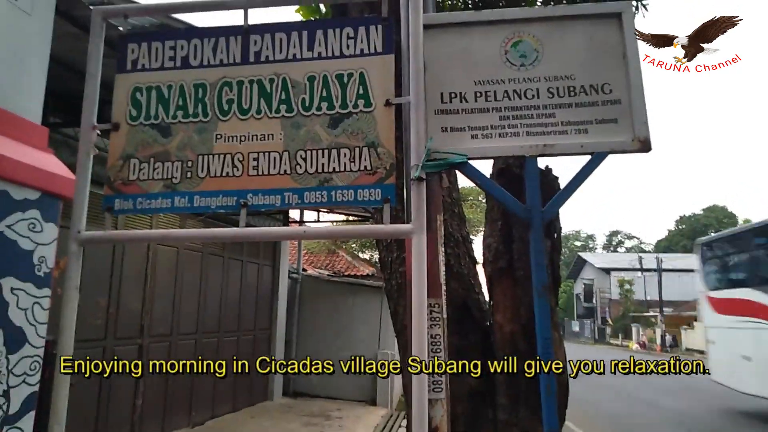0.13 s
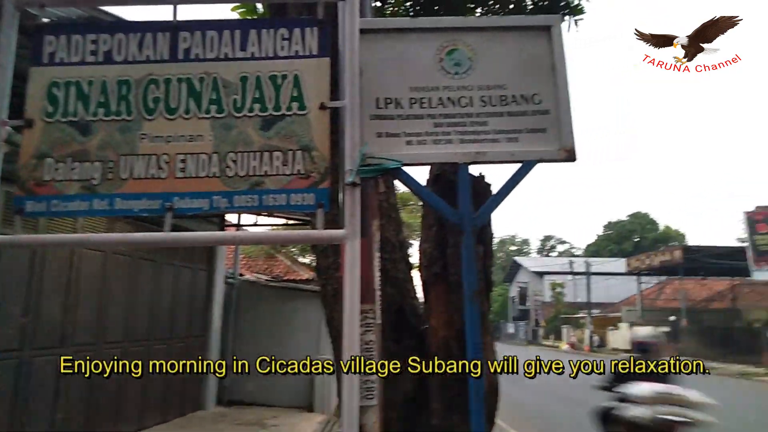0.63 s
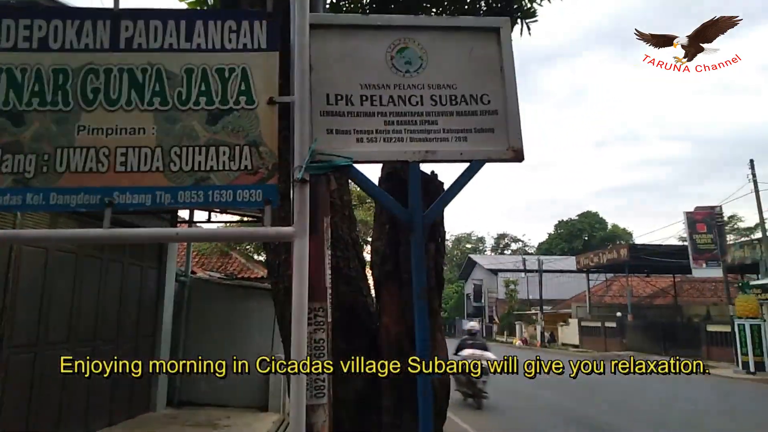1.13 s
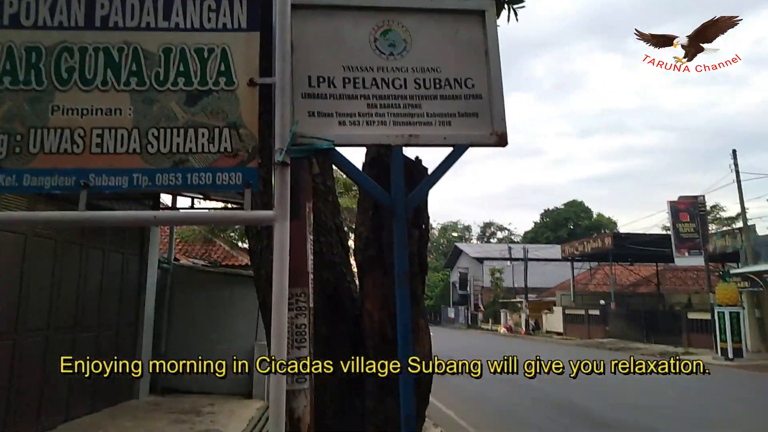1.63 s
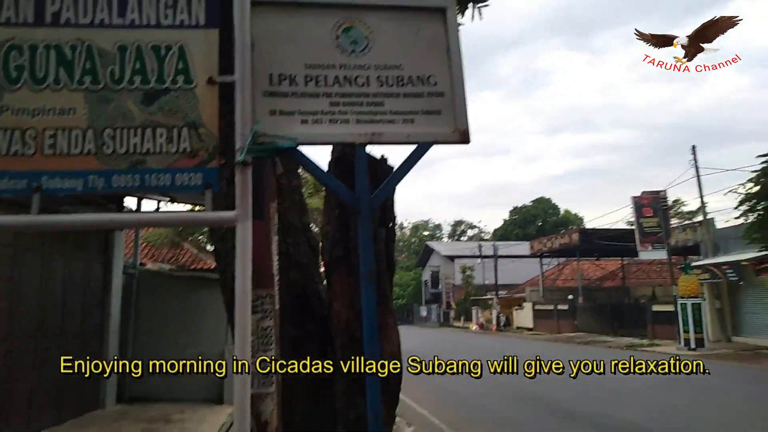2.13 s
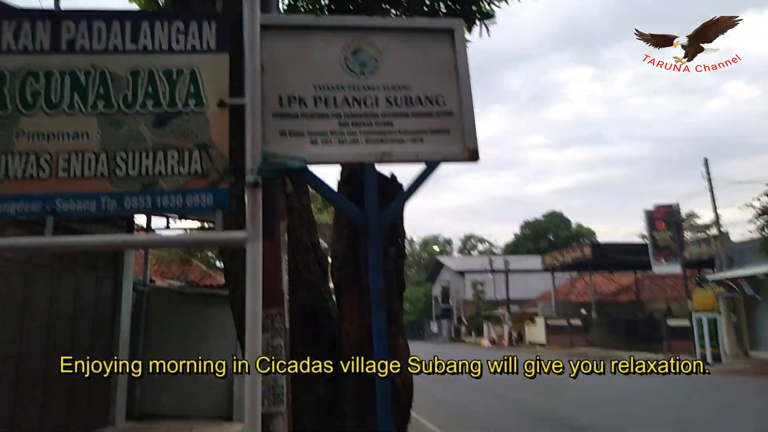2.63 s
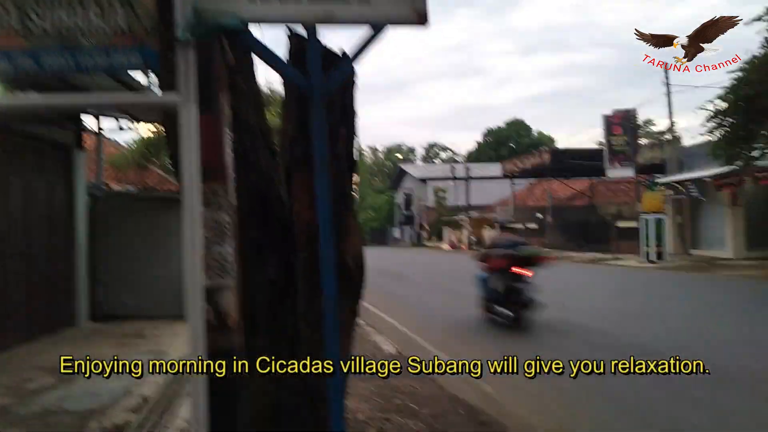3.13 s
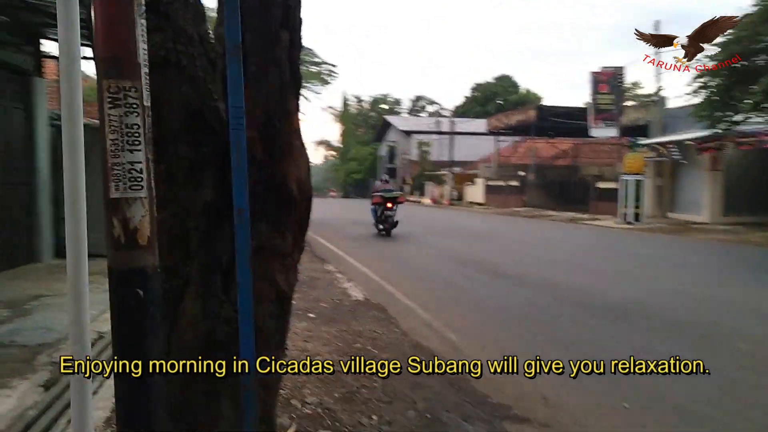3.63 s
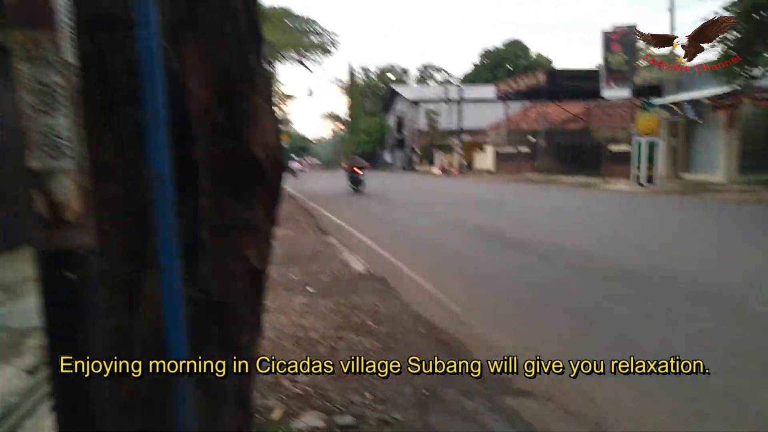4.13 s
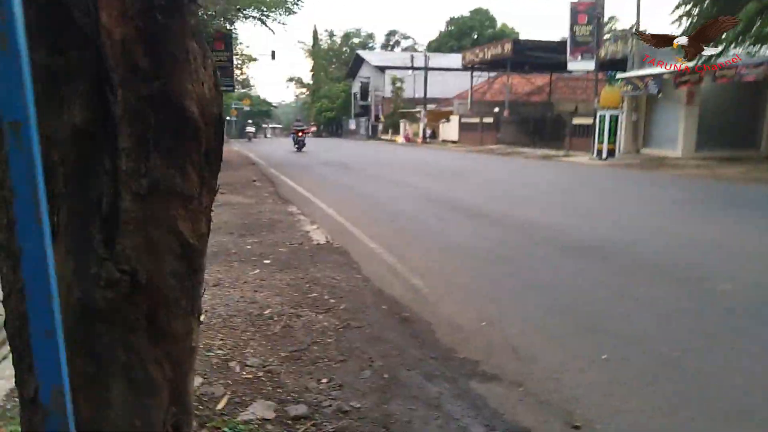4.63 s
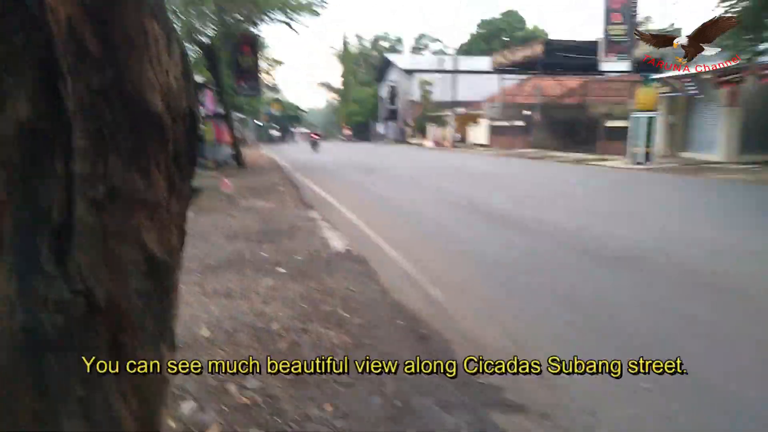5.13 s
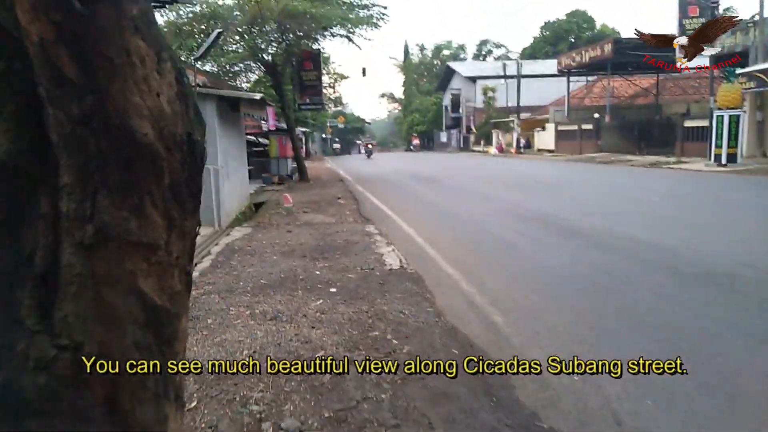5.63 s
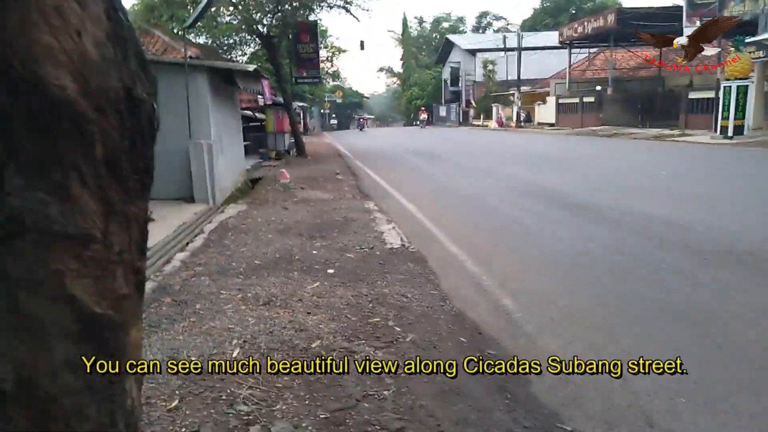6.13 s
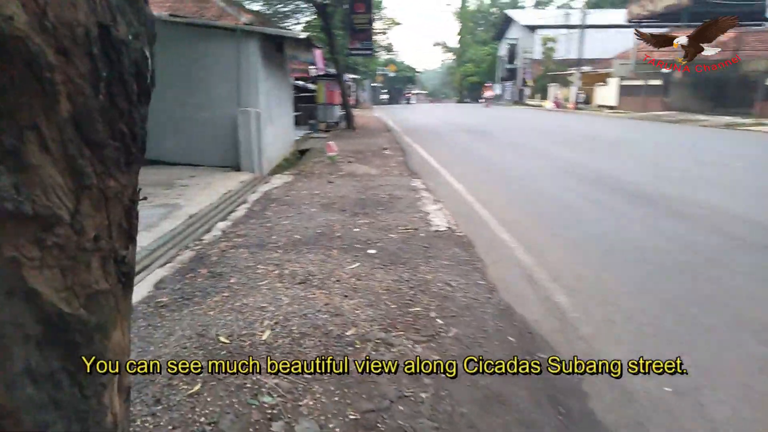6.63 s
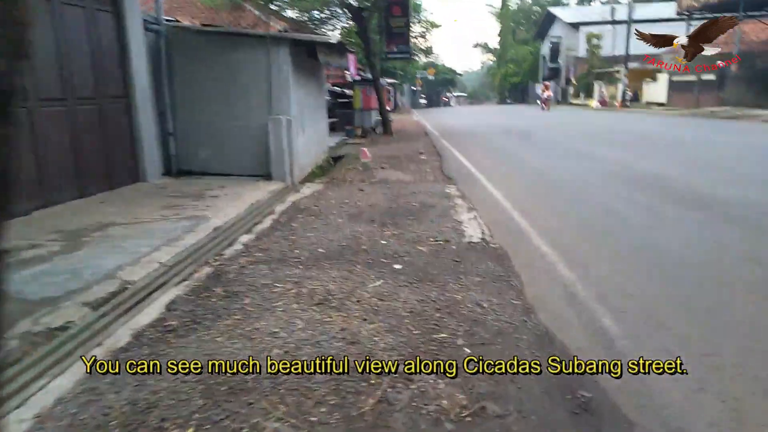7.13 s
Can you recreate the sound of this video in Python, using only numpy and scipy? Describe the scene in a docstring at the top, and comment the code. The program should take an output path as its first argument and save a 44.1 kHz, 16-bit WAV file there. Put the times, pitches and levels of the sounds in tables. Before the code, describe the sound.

A bus pulls away over loud tyre roar, a rooster crows faintly, then a motorbike whips past close and fades before a small bird trills.

```python
"""A motorbike comes close, passes the microphone at five metres and fades down a village road: its thump is a
stack of firing harmonics, Doppler-shifted with its gear whine. A bus pulls away and another motorbike leaves,
both summed from harmonics; road roar, rumble and hiss are shaped noise, while narrow hums from tyre tread and
the passing bike's body and a far engine are wavering tones. Behind them a rooster crows faintly on two
harmonics and a small bird trills in short falling whistles. Tiny noise ticks sit close by; a phone's single
microphone hears it all from the roadside."""
import sys
import numpy as np
from scipy import signal
from scipy.fft import rfft, irfft, next_fast_len
from scipy.io import wavfile
from scipy.ndimage import uniform_filter1d, map_coordinates

SR = 44100
rng = np.random.default_rng(int(sys.argv[2]) if len(sys.argv) > 2 else 0)


def store_wav(level_fs):
    """Save 16-bit WAV to argv[1]."""
    pcm = np.round(np.clip(np.atleast_2d(level_fs), -1, 1) * 32767)
    wavfile.write(sys.argv[1], SR, pcm.T.astype(np.int16))


def gain_from_db(level_db):
    """Convert decibel levels to linear amplitude factors (20 dB per decade)."""
    decades = np.asarray(level_db, float) / 20
    return 10 ** decades


N = 320166
T = np.arange(N) / SR

# rooster, faint: start_s, pitch_hz, level_db
ROOSTER_CROW = [(.84, 688, -60.5), (.9, 706, -24), (1, 728, -30), (1.12, 723, -32), (1.2, 704, -30),
                (1.26, 688, -57.5)]
# bird phrases: start_s, notes (count), gap_s, gap_growth_s (per note), first_db, last_db, grace_db (re the note)
BIRD_PHRASES = [(5.506, 12, .045, 0, -43, -29.5, -4), (6.067, 18, .0672, .00022, -34.5, -33.5, -14)]
NOTE_SCATTER_DB = 1.2
# faint ticks close by: start_s, level_db (nominal, 3 dB is taken off)
CLOSE_TICKS = [(5.9464, -28), (6.8284, -29), (6.8494, -36)]

# far engine, speeding up gently
DRONE_FROM_S, DRONE_HZ, DRONE_RISES_HZ_PER_S = 4.5, 52, 1.35
DRONE_DB, DRONE_OCTAVE_DB = -33.5, -45.5

# leaving motorbike: start_s, pitch_hz (base of its harmonics), level_db (added to each harmonic)
LEAVING_ENGINE = [(0, 33.64, -25), (.5, 31.62, -21), (1.05, 31.14, -25), (1.75, 30.15, -35.5)]
# its harmonics: multiple (of pitch_hz), level_db (relative)
LEAVING_HARMONICS = [(3, -0.5), (4, 0.5), (5, -41), (6, -6.5), (7, -30), (8, -15)]

# bus diesel: start_s, pitch_hz (base of its orders), level_db (of the firing tone)
BUS_ENGINE = [(0, 63.0, -22), (.2, 63.8, -18), (.6, 63.6, -17.5), (.76, 64.4, -26), (.95, 65.0, -23),
              (1.2, 64.7, -13.5), (1.9, 64.6, -17), (2.5, 65.5, -21.5), (3.5, 67.3, -31.5),
              (3.9, 68.5, -28), (4.45, 69.3, -40), (4.75, 69.8, -37), (5.2, 70.8, -36), (5.6, 71.5, -31),
              (5.85, 73.6, -49)]
# further bus orders: multiple (of pitch_hz), level_db (re the firing tone)
BUS_EXTRA_ORDERS = [(.5, -30), (1.5, -33.5), (3, -13.5)]
# bus octave, swelling and sinking on its own: start_s, level_db
BUS_OCTAVE_LEVEL = [(0, -31), (.4, -33), (1.1, -36), (2.8, -30), (3.5, -49), (3.9, -25), (4.9, -35.5),
                    (5.85, -40)]
# bus turbo whistle: start_s, pitch_hz, level_db
TURBO_WHISTLE = [(.3, 7600, -70), (.45, 7750, -48), (.95, 8400, -49), (1.1, 8500, -70)]

# noise spectra: frequency_hz, density_db (per Hz, relative: the noise is scaled to rms 1)
ROAR_SPECTRUM = [(130, -35), (220, -5), (290, -7.5), (340, -1.5), (420, -4.5), (600, 1), (860, 1),
                 (1030, -2), (1330, 0), (1600, -2.5), (1960, -2.5), (2500, -9.5), (3100, -17.5),
                 (3900, -55.5), (5000, -51)]
RUMBLE_SPECTRUM = [(20, -34), (33, -1), (45, -3), (78, -3), (110, 2), (170, 0), (240, -7.5), (350, -16.5),
                   (460, -67)]
FAR_HISS_SPECTRUM = [(1880, -30), (3200, 0), (3490, 1), (3800, -4), (4120, -6), (4490, -4), (5450, -11),
                     (6270, -7.5), (7500, -2.5), (10500, -18.5), (15700, -61)]
# near hiss, with the microphone's two treble peaks: the same columns
NEAR_HISS_SPECTRUM = [(1880, -36), (3200, 4), (4180, -10), (6270, -8.5), (7600, 3.5), (8740, -6.5),
                      (9990, -9.5), (12000, -9.5), (13600, -9.5), (15200, -3.5), (15700, -5)]
# tyre roar on the asphalt: start_s, level_db
ROAR_LEVEL = [(0.0, -13), (0.44, -13.5), (1.19, -14), (1.37, -15.5), (1.82, -14.5), (2.22, -16.5),
              (2.51, -13), (2.81, -14), (3.11, -20), (3.7, -21), (3.88, -24), (5.6, -27), (6.33, -30.5),
              (7.12, -30), (7.26, -31.5)]
# narrow notes, from tyre tread and (near 1.36 kHz) the passing bike's body: centre_s, half_length_s, pitch_hz,
# level_db
NARROW_NOTES = [(.12, .05, 745, -26), (1.05, .2, 870, -23), (1.75, .15, 850, -27), (2.52, .08, 1360, -25),
                (2.82, .06, 1365, -24)]
# echo off the asphalt while the bike is close: start_s, lag_ms, strength (ratio, negative is inverted)
GROUND_ECHO = [(2.3, .23, 0), (2.65, .228, -.25), (2.87, .2, -.1), (3.05, .285, -.4), (3.4, .315, -.35),
               (3.9, .34, -.2), (4.3, .35, 0)]
# near treble as traffic goes by: peak_s, rise_s, fall_s, hiss_db, clatter_db (valves)
TREBLE_SWELLS = [(.3, .4, 0.63, -28.5, -41), (.28, .08, 0.085, -45, -27), (2.63, 0.082, 0.13, -24.5, -31),
                 (2.8, 0.082, 0.051, -33, -24), (3.2, 0.13, 0.22, -40.5, -37),
                 (7.079, 0.11, 0.15, -44, -72)]
# roar tilt in dB per octave: duller with time, brighter as the bike goes by
TILT_DB, TILT_DULLS_DB_PER_S, TILT_NEAR_DB, TILT_NEAR_S = 1, 0.41, 4, 0.21
TILT_FROM = .55  # the tilt is held below this share of its pivot frequency
# the low rumble follows the roar sluggishly (dB per dB, smoothed); its tilt is per octave
RUMBLE_DB, RUMBLE_FOLLOWS, RUMBLE_SMOOTHING_S, RUMBLE_DULLS_DB_PER_S = -10.5, 0.7, 0.72, 0.3
NEAR_FLOOR_DB, FAR_FLOOR_DB = -62.5, -44.5
FAR_BUS_DB, FAR_BUS_FADES_DB_PER_S = -39, 7.6
FAR_BIKE_DB, HISS_LOSS_DB = -28, 4.5  # at the closest point; loss for each doubling of distance

# passing motorbike
PASS_S, PASS_M, SPEED_M_PER_S, SOUND_M_PER_S, HEARD_FROM_S = 2.72, 5, 20.2, 343, 1.5
TURN_S, TURN_LENGTH_S = 2.82, 0.05  # when the pipe swings towards the listener
# its firing rate sags: start_s, pitch_hz (before the Doppler shift)
PASSING_ENGINE = [(2.75, 45.85), (3.1, 45.1), (5.4, 41.0), (7.26, 38.5)]
# its exhaust points backwards: multiple (of the firing rate), front_db, behind_db (relative)
PASSING_HARMONICS = [(1, -42, -38), (2, -25, -27), (3, -31.5, -18), (4, -24.5, -16), (5, -33.5, -24),
                     (6, -42, -30.5), (7, -48, -37), (8, -47, -44), (9, -59, -51), (10, -45, -41.5)]
# its thump: start_s, level_db (added to each harmonic)
THUMP_LEVEL = [(1.5, -7), (1.8, -4), (2.5, -2), (3, -2), (3.3, -7), (3.9, -9.5), (5, -9.5), (5.8, -13.5),
               (6.2, -18), (6.7, -17), (7.26, -17)]
MESH = 62.8  # gear teeth per firing
# its gear whine: start_s, level_db, sideband_db
GEAR_WHINE = [(1.5, -43, -60), (2.3, -41, -57), (2.75, -26.5, -42), (3.1, -34, -46), (3.35, -46, -55),
              (4.2, -49, -55), (4.6, -43, -51), (5.1, -45, -45), (5.6, -45, -48), (5.85, -54, -57),
              (6.3, -50, -52), (6.6, -57, -59), (7.26, -53, -54)]


def unit(x):
    """Scale to rms 1."""
    return x / np.sqrt(np.mean(x ** 2) + 1e-20)


def curves(rows, t=T):
    """One value per instant for each column after the time."""
    s, *cols = np.transpose(rows)
    return [np.interp(t, s, c) for c in cols]


def sounding(rows, fade):
    """Gain that fades in before the first row and out after the last."""
    fade_in = np.clip((T - rows[0][0]) / fade + 1, 0, 1)
    fade_out = np.clip((rows[-1][0] - T) / fade + 1, 0, 1)
    return fade_in * fade_out


def wobble(rate):
    """A smooth random curve, rate knots a second."""
    return map_coordinates(rng.standard_normal(int(N * rate / SR) + 4), [T * rate])


def tones(hz, orders, waver_db, blur, rate):
    """Harmonics (multiple, dB rms) of one pulse train; echoes make each waver in size and phase (blur, radians)."""
    turn = 2 * np.pi * np.cumsum(hz) / SR
    total = np.zeros(N)
    for multiple, db in orders:
        size = np.sqrt(2) * gain_from_db(db + waver_db * wobble(rate))
        total -= size * np.cos(multiple * turn + blur * wobble(rate))
    return total


def rush(spectrum, tilt_db, pivot_hz, patchy_db, ground=False, size=1024):
    """Noise of rms 1 with drifting patches, a moving tilt and a comb from the ground echo."""
    hz, t, z = signal.stft(rng.standard_normal(N), SR, nperseg=size)
    f, db = np.transpose(spectrum)
    colour = np.interp(np.log(hz + 1), np.log(f), db, left=-120, right=-120)[:, None]
    octaves = np.log2(np.maximum(hz[:, None] / pivot_hz, TILT_FROM))
    slope = octaves * np.interp(t, T, tilt_db + 0 * T)
    across_hz = uniform_filter1d(rng.standard_normal(z.shape), size=7, axis=0)
    patches = unit(uniform_filter1d(across_hz, size=9, axis=1))
    lag_ms, echo = curves(GROUND_ECHO, t)
    comb = np.abs(1 + ground * echo * np.exp(-2j * np.pi * hz[:, None] * lag_ms / 1e3))
    gain = gain_from_db(colour + slope) * comb
    gain = gain / np.sqrt(np.mean(gain ** 2, axis=0))  # a new colour leaves the level alone
    return unit(signal.istft(z * gain * gain_from_db(patchy_db * patches), SR, nperseg=size)[1][:N])


def rooster():
    """A hoarse crow, strongest on its second harmonic."""
    hz, db = curves(ROOSTER_CROW)
    return gain_from_db(db) * tones(hz, [(1, 0), (2, 1)], waver_db=2.5, blur=0.22, rate=55)


def bird():
    """Short falling whistles after higher grace notes: a fast swelling phrase, a slow even one; one echo."""
    song, t = np.zeros(N + SR), np.arange(-SR // 25, SR // 25) / SR
    note = np.exp(-.5 * ((t - .007) / 0.0044) ** 2) * np.sin(2 * np.pi * 3440 * t * (1 - 1.23 * t))
    grace = np.exp(-.5 * ((t + 0.0095) / 0.007) ** 2) * np.sin(2 * np.pi * 3560 * t * (1 - 0.53 * t))
    for start, count, gap, grows, first_db, last_db, grace_db in BIRD_PHRASES:
        whistle = note + grace * gain_from_db(grace_db)
        for k in range(count):
            db = first_db + (last_db - first_db) * np.sin(1.5 * k / (count - 1))
            db += NOTE_SCATTER_DB * rng.standard_normal()
            centre = round((start + gap * k + grows * k * k / 2) * SR)
            song[centre - SR // 25:][:len(t)] += gain_from_db(db) * whistle
    echo = gain_from_db(-9) * np.roll(song, round(0.015 * SR))
    return (song + echo)[:N]


def far_drone():
    """A distant engine heard as a slowly rising tone and its octave, both wavering."""
    hz = DRONE_HZ + DRONE_RISES_HZ_PER_S * (T - DRONE_FROM_S)
    drone = tones(hz, [(1, DRONE_DB), (2, DRONE_OCTAVE_DB)], waver_db=2.0, blur=0.9, rate=12)
    return np.clip(T - DRONE_FROM_S + .5, 0, 1) * drone


def leaving_bike():
    """Upper harmonics of a sinking engine pitch that fade out as the motorbike leaves."""
    hz, level_db = curves(LEAVING_ENGINE)
    engine = tones(hz, LEAVING_HARMONICS, waver_db=1.5, blur=.35, rate=6)
    return sounding(LEAVING_ENGINE, fade=.3) * gain_from_db(level_db) * engine


def bus_engine():
    """A heavy firing tone with its octave; unequal cylinders add half orders, and a third order joins them."""
    hz, tone_db = curves(BUS_ENGINE)
    orders = [(0.99, tone_db)] + [(k, tone_db + db) for k, db in BUS_EXTRA_ORDERS]
    firing = tones(hz, orders, waver_db=.6, blur=.1, rate=6)
    octave = tones(2 * hz, [(1, curves(BUS_OCTAVE_LEVEL)[0])], waver_db=1, blur=.1, rate=6)
    return sounding(BUS_ENGINE, fade=.15) * (firing + octave)


def bus_turbo():
    """The turbo spools up: a thin rising whistle, roughened by fast wavering."""
    hz, db = curves(TURBO_WHISTLE)
    return tones(hz, [(1, db)], waver_db=3, blur=1.4, rate=120)


def ticks():
    """Tiny dry clicks in the top treble: differenced noise that decays 60 dB in 3.4 ms."""
    out, t = np.zeros(N), np.arange(200) / SR
    for s, db in CLOSE_TICKS:
        click = np.diff(rng.standard_normal(len(t) + 2), 2) / 2
        out[round(s * SR):][:len(t)] += gain_from_db(db - 3 - 60 * t / 0.0034) * click
    return out


def bike_path():
    """Distance in doublings of the closest one, and Doppler-shifted firing rate, of the passing bike."""
    x = SPEED_M_PER_S * (T - PASS_S)
    r = np.hypot(x, PASS_M)
    doppler = 1 - SPEED_M_PER_S / SOUND_M_PER_S * x / r
    return np.log2(r / PASS_M), curves(PASSING_ENGINE)[0] * doppler


def swells(column):
    """Summed gain of the treble swells, each rising and falling as distance does."""
    power = np.zeros(N)
    for row in TREBLE_SWELLS:
        peak_s, rise_s, fall_s = row[:3]
        away = (T - peak_s) / np.where(T < peak_s, rise_s, fall_s)
        power += gain_from_db(row[column]) ** 2 / (1 + away ** 2) ** 1.16
    return np.sqrt(power)


def far_hiss():
    """Distant treble of bus and bike over a steady floor, pulsing gently at the bike's firing rate."""
    doublings, hz = bike_path()
    bus_gain = gain_from_db(FAR_BUS_DB - FAR_BUS_FADES_DB_PER_S * T)
    bike_gain = gain_from_db(FAR_BIKE_DB - HISS_LOSS_DB * doublings)
    gain = np.sqrt(gain_from_db(FAR_FLOOR_DB) ** 2 + bus_gain ** 2 + bike_gain ** 2)
    cycle = np.cumsum(hz) / SR
    pulse = gain_from_db(1.2 * np.cos(2 * np.pi * cycle + .6) + .6 * wobble(14))
    return gain * pulse * rush(FAR_HISS_SPECTRUM, 0, pivot_hz=7500, patchy_db=.8, ground=True)


def road_rumble():
    """Low noise that follows the smoothed roar level and slowly dulls."""
    smooth_db = uniform_filter1d(curves(ROAR_LEVEL)[0], round(RUMBLE_SMOOTHING_S * SR), mode="nearest")
    tilt = -RUMBLE_DULLS_DB_PER_S * T
    noise = rush(RUMBLE_SPECTRUM, tilt, pivot_hz=100, patchy_db=1.1, size=8192)
    return gain_from_db(RUMBLE_DB + RUMBLE_FOLLOWS * smooth_db) * noise


def tyre_roar():
    """Tyres roar on the asphalt: mid noise, combed by the ground echo and brightest as the bike goes by."""
    near = np.exp(-((T - PASS_S - .08) / TILT_NEAR_S) ** 2)
    tilt = TILT_DB - TILT_DULLS_DB_PER_S * T + TILT_NEAR_DB * near
    noise = rush(ROAR_SPECTRUM, tilt, pivot_hz=1100, patchy_db=1.1, ground=True)
    return gain_from_db(curves(ROAR_LEVEL)[0]) * noise


def narrow_hums():
    """Narrow, rough notes that swell and go: tread blocks sing the lower ones, the passing bike's body rings
    near 1.36 kHz."""
    total = np.zeros(N)
    for s, length, hz, db in NARROW_NOTES:
        swell = np.exp(-.5 * ((T - s) / length) ** 2)
        total += swell * tones(hz + 0 * T, [(1, db)], waver_db=2.5, blur=1.6, rate=50)
    return total


def near_hiss():
    """Close treble noise that swells as traffic goes by, over a faint floor."""
    gain = np.hypot(swells(column=3), gain_from_db(NEAR_FLOOR_DB))
    return gain * rush(NEAR_HISS_SPECTRUM, 0, pivot_hz=7500, patchy_db=.9, ground=True)


def valve_clatter():
    """Each firing of the near engine throws a burst of clatter into the top treble."""
    cycle = np.cumsum(bike_path()[1]) / SR
    pulse_db = 4.9 * np.cos(2 * np.pi * cycle + 0.32) + 2.5 * np.cos(4 * np.pi * cycle + 2.9)
    burst = unit(gain_from_db(pulse_db + 2.2 * wobble(45)))
    return swells(column=4) * burst * rush(NEAR_HISS_SPECTRUM, 2.2, pivot_hz=7500, patchy_db=1.2, ground=True)


def gear_whine(hz):
    """Gear teeth mesh at a multiple of the firing rate, flanked by sidebands."""
    mesh_db, side_db = curves(GEAR_WHINE)
    sidebands = [(MESH - 2, side_db), (MESH + 2, side_db), (MESH + 4, side_db - 5)]
    whine = tones(hz, [(MESH, mesh_db)], waver_db=2.5, blur=.8, rate=20)
    return whine + tones(hz, sidebands, waver_db=3.5, blur=1.1, rate=11)


def exhaust_thump(hz):
    """One cylinder thumps; its harmonics change balance as the pipe swings towards the listener."""
    back = (1 + np.tanh((T - TURN_S) / TURN_LENGTH_S)) / 2
    orders = [(k, front + (rear - front) * back) for k, front, rear in PASSING_HARMONICS]
    return gain_from_db(curves(THUMP_LEVEL)[0]) * tones(hz, orders, waver_db=1.1, blur=.12, rate=6)


def passing_bike():
    """Thump and gear whine share one firing rate, so both drop in pitch as the bike goes by."""
    hz = bike_path()[1]
    fade_in = np.clip((T - HEARD_FROM_S) / .3 + 1, 0, 1)
    return fade_in * (exhaust_thump(hz) + gear_whine(hz))


def scene():
    """Everything reaches one microphone, from the background to the passing bike."""
    background = rooster() + bird() + far_drone()
    traffic = leaving_bike() + bus_engine() + bus_turbo()
    road = far_hiss() + road_rumble() + tyre_roar() + narrow_hums() + near_hiss()
    return (background + traffic + road + ticks() + valve_clatter() + passing_bike())[None]


def low_pass(x):
    """Removes everything above the highest recorded frequency."""
    return signal.sosfilt(signal.butter(12, 17110, fs=SR, output="sos"), x)


def record(dry):
    """The loudest peaks clip softly, then the band ends sharply at 15750 Hz."""
    soft = dry / (1 + np.abs(dry) ** 8) ** (1 / 8)
    m = next_fast_len(N + 8192)
    in_band = np.fft.rfftfreq(m, 1 / SR) < 15750
    mix = irfft(rfft(soft, m) * in_band, m)[..., :N]
    return low_pass(mix)


dry = scene()
out = record(dry)
store_wav(out)
```